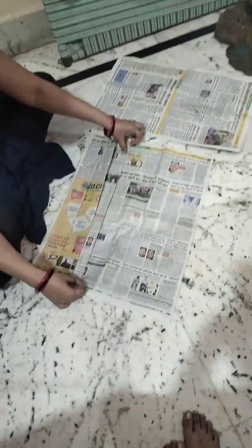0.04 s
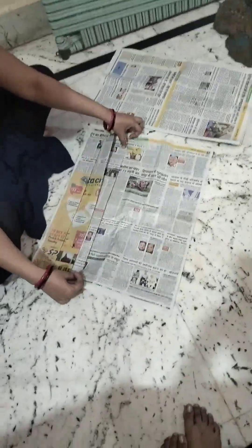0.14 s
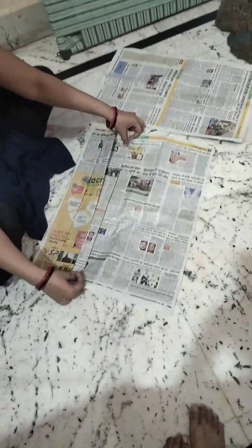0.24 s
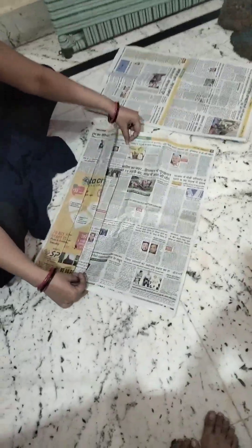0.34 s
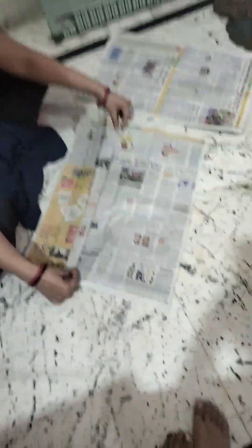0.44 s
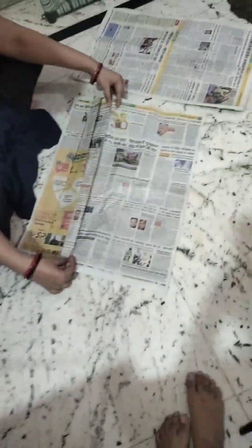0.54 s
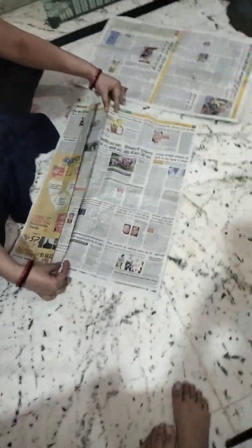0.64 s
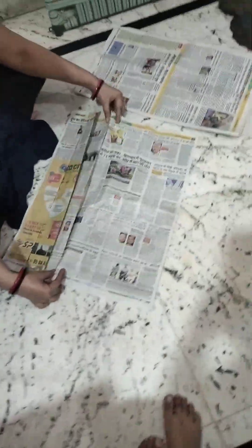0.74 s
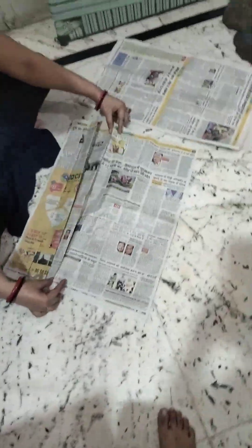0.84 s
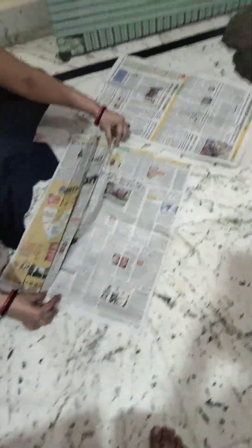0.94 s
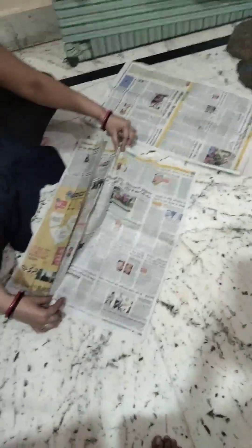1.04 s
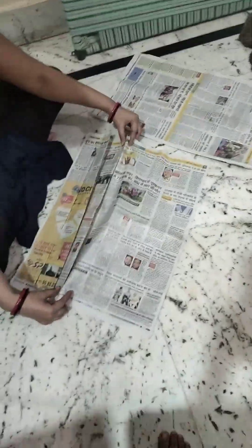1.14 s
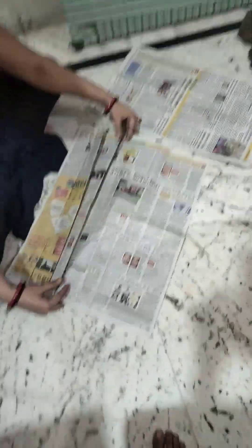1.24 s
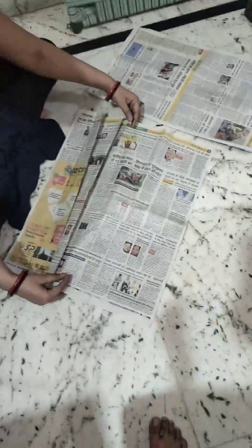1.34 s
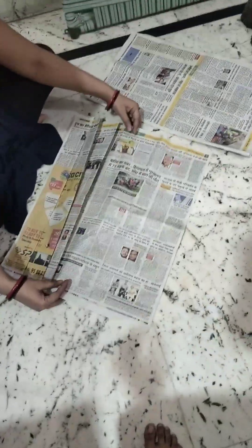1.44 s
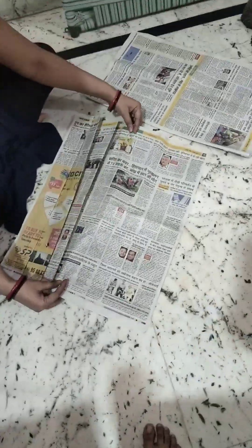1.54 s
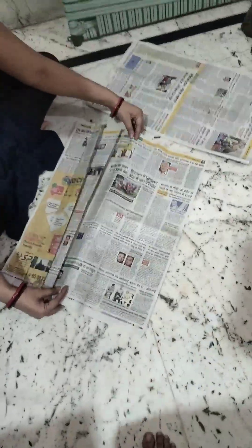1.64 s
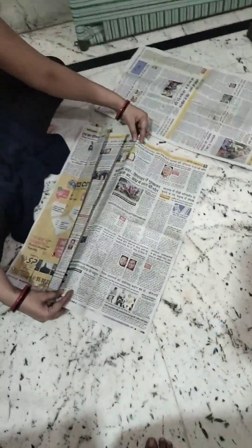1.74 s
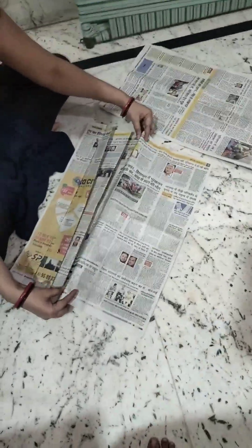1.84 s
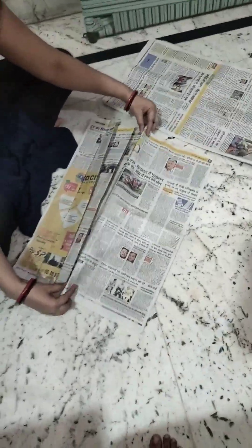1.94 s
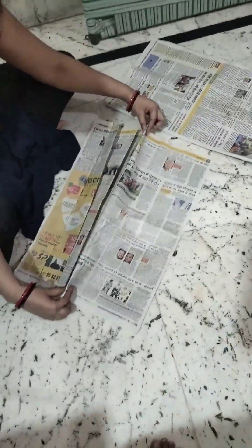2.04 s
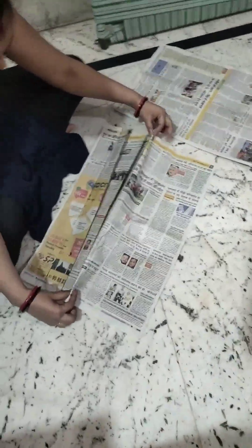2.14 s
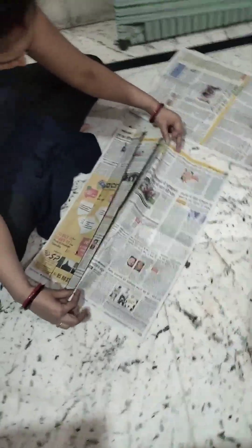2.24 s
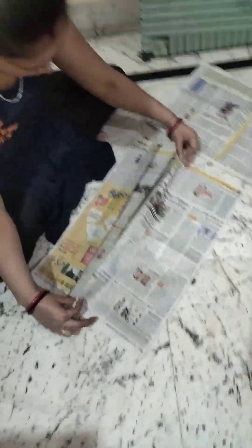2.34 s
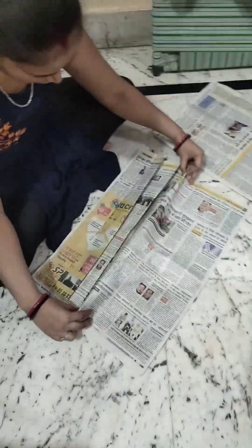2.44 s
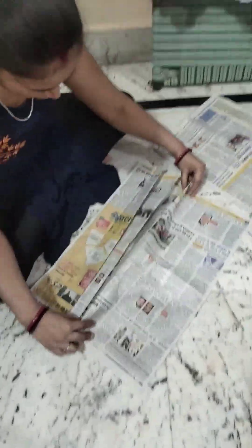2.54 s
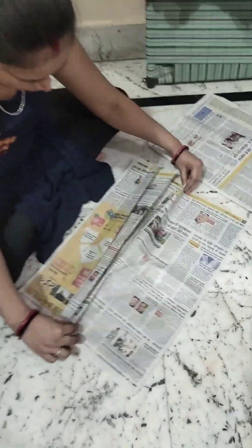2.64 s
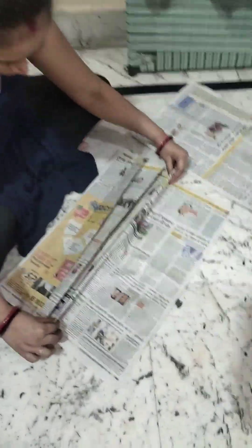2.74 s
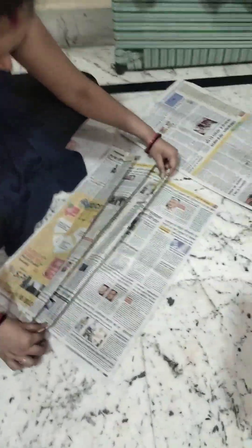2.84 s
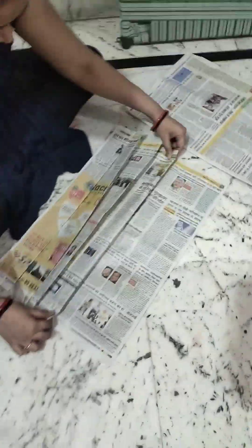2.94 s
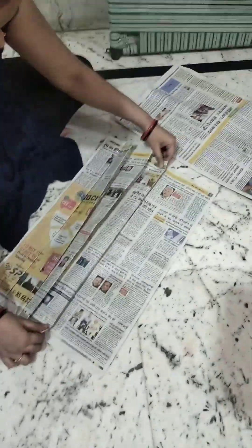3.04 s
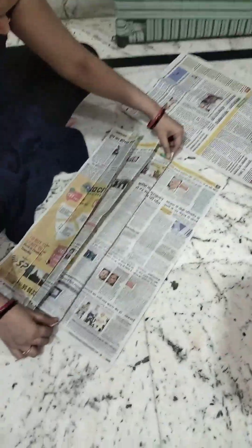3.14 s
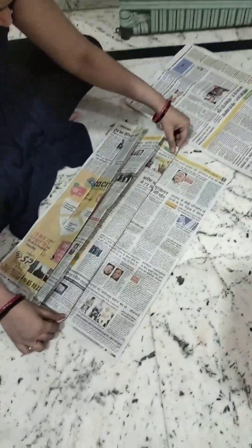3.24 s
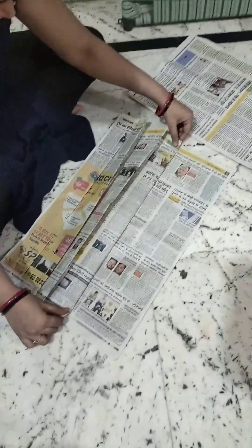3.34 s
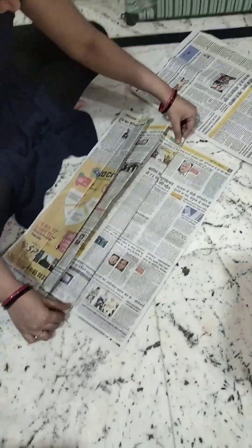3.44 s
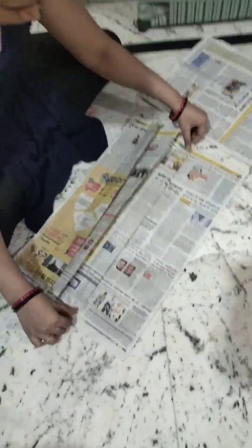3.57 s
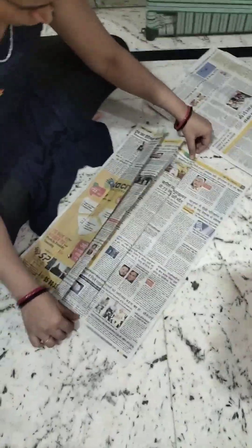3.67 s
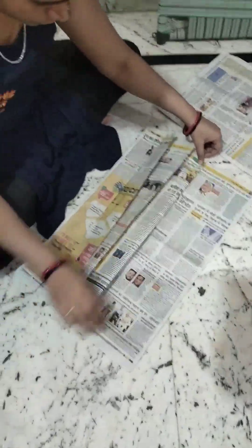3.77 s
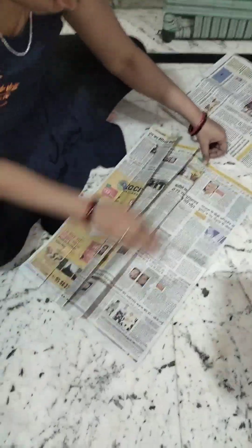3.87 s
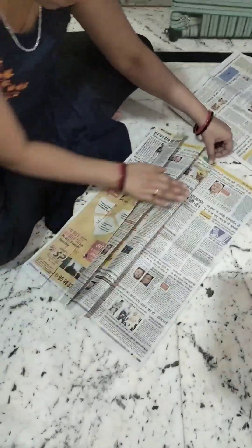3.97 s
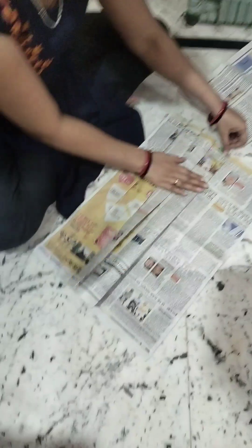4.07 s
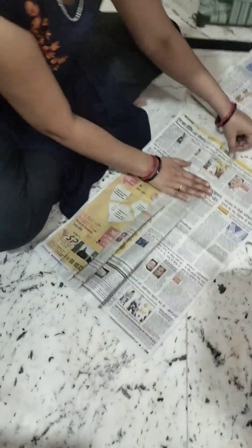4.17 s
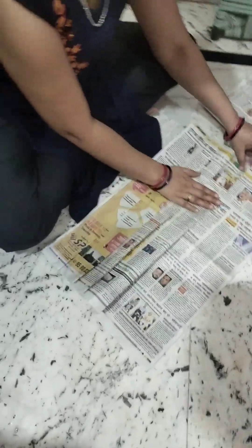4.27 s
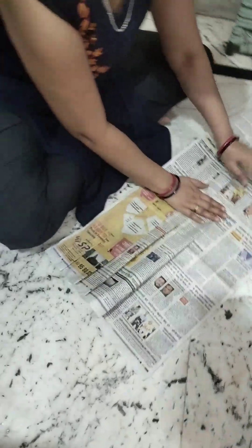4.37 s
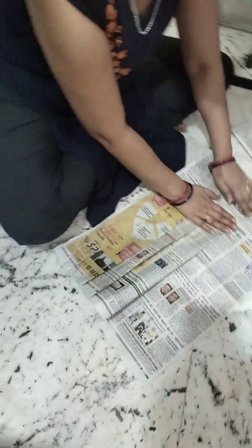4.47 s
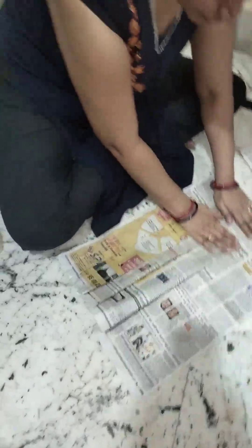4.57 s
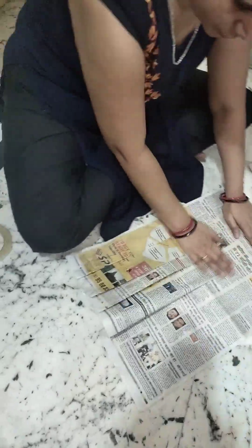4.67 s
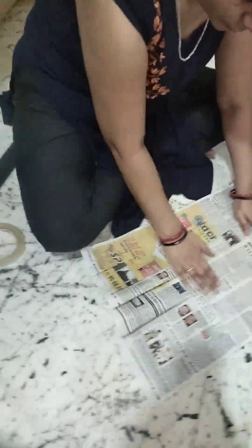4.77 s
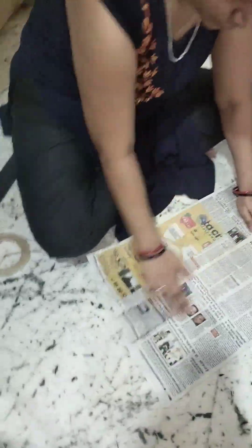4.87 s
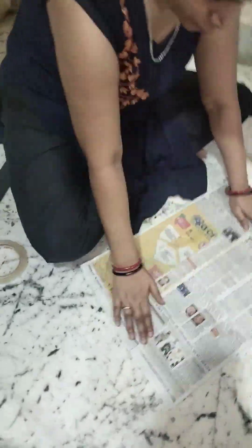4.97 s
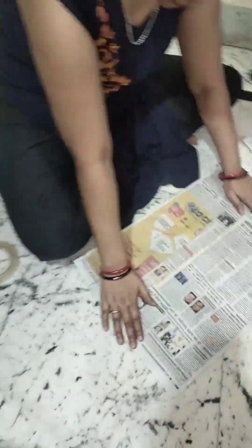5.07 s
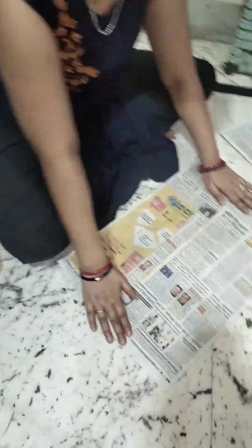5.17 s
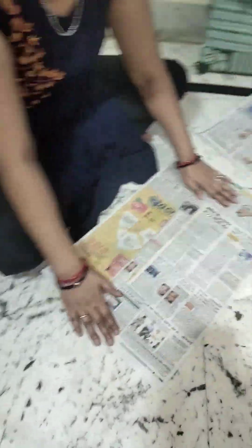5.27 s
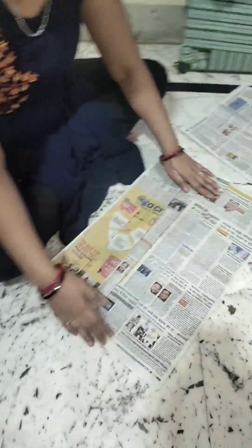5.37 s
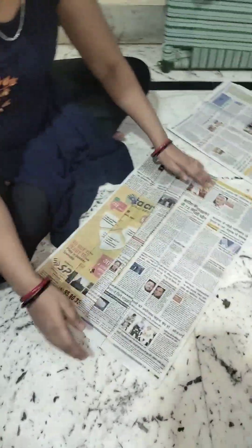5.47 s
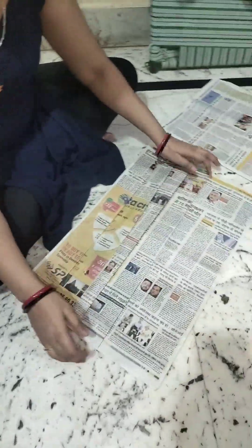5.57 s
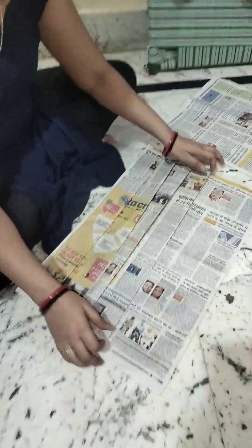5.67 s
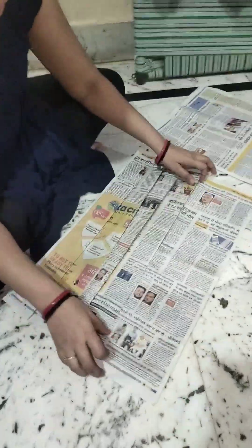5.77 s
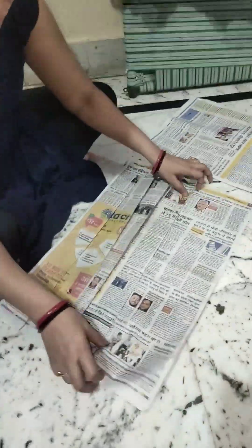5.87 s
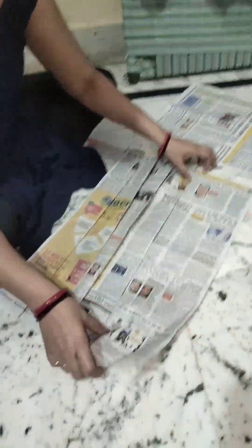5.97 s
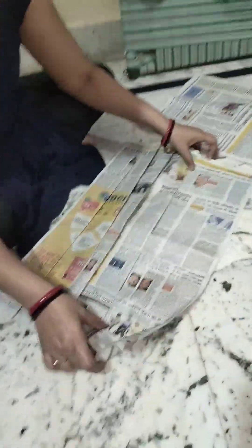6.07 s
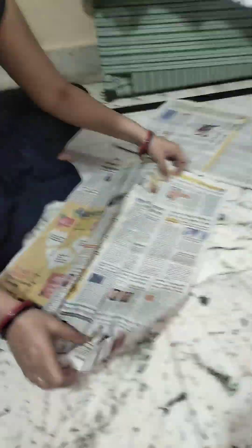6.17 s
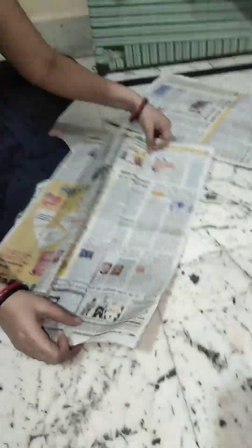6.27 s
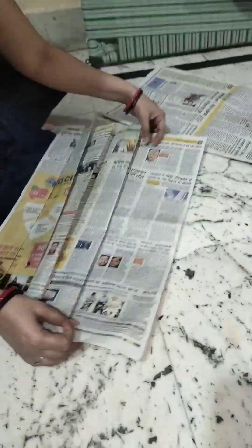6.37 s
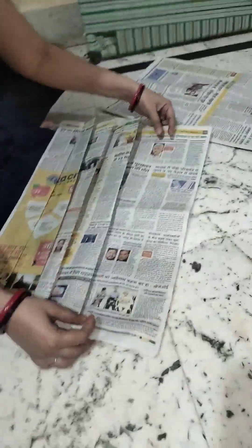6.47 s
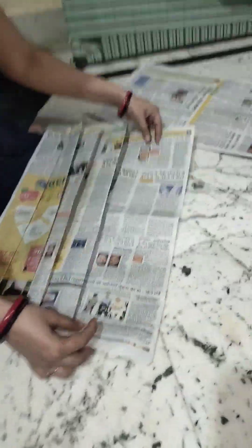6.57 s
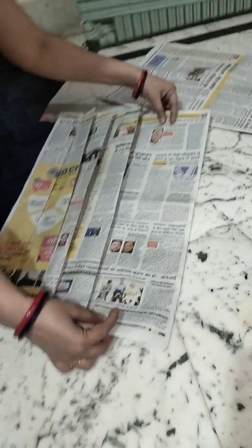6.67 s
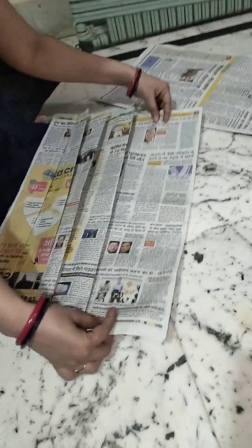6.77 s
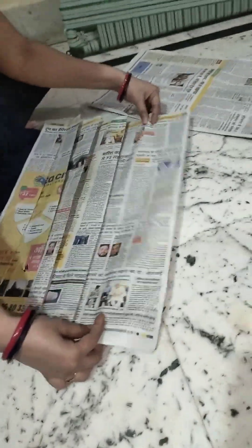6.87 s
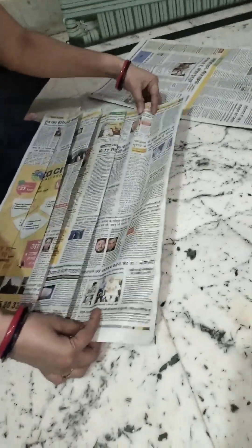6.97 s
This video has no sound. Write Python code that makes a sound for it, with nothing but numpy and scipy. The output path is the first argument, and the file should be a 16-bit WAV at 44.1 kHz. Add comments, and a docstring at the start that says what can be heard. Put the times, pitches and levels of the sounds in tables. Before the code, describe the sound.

Hands crease and press newspaper up close, with faint bangle clinks, a steady low hum and booming thuds of shifted wood.

```python
"""A bare room with a hard floor, filled by a fan-like hum.
Out of sight something heavy and wooden is dragged and bumped: jerks and blows make its body boom.
Up close, hands fold and press newspaper on the floor: creases snap over a rustle of tiny buckles,
and glass bangles clink on the wrist. A hand-held phone with two ports listens."""
import sys
import numpy as np
from scipy import signal
from scipy.fft import rfft, irfft, next_fast_len
from scipy.io import wavfile
from scipy.ndimage import uniform_filter1d, minimum_filter1d

SR = 44100
rng = np.random.default_rng(int(sys.argv[2]) if len(sys.argv) > 2 else 0)


def wrap_up_sound(samples):
    """Save the sound to the file named by the first command line argument, as 16-bit audio."""
    columns = np.atleast_2d(samples).T
    # keep every value between -1 and 1, then stretch to whole-number steps
    tamed = np.clip(columns, -1, 1)
    steps = np.round(tamed * 32767).astype(np.int16)
    wavfile.write(sys.argv[1], SR, steps)


N = 309141


def undb(db):
    return 10 ** (np.asarray(db) / 20)


def level(x, db):
    """Set the rms level."""
    return x * undb(db) / np.sqrt(np.mean(x ** 2))


def pan(x, db):
    """Place a sound with the left side db louder than the right."""
    return x * undb(np.array([db, -db]).reshape(2, -1) / 2)


def butter(x, order, hz, kind):
    return signal.sosfilt(signal.butter(order, hz, kind, fs=SR, output="sos"), x)


def band(x, lo_hz, hi_hz):
    return butter(x, 2, [lo_hz, hi_hz], "band")


def colour(x, table):
    """EQ through points of (frequency [Hz], level [dB])."""
    hz, db = np.transpose(table)
    size = next_fast_len(N)
    bins_hz = np.maximum(np.fft.rfftfreq(size, 1 / SR), 1)
    eq = undb(np.interp(np.log(bins_hz), np.log(hz), db))
    return irfft(rfft(x, size) * eq, size)[..., :N]


def ring(x, hz, t60):
    """One mode, deaf to steady pressure; a unit blow rings with amplitude near 1."""
    r, w = 1000 ** (-1 / (t60 * SR)), 2 * np.pi * hz / SR
    return signal.lfilter([1, -1], [1, -2 * r * np.cos(w), r * r], x)


def drift(rate_hz):
    """Smooth random modulation: held levels, slewed twice."""
    hold = int(SR / rate_hz)
    steps = np.repeat(rng.standard_normal(N // hold + 1), hold)
    return uniform_filter1d(uniform_filter1d(steps, hold), hold)[:N]


def grains(per_s, spread_db, length_s):
    """Noise let through by scattered short bursts of uneven size."""
    sizes = (rng.random(N) < per_s / SR) * undb(spread_db * rng.exponential(size=N))
    fall = np.exp(-1 / (length_s * SR))
    envelope = np.sqrt(signal.lfilter([1], [1, -fall], sizes ** 2))
    return level(rng.standard_normal(N) * envelope, 0)


def strokes(start_s, hold_s, db, rise_db_s, fall_db_s):
    """Power of each stroke, once a millisecond: it climbs until start_s, holds and fades."""
    t = np.arange(N * 1000 // SR + 1)[:, None] / 1000
    attack_db = rise_db_s * np.maximum(start_s - t, 0)
    release_db = fall_db_s * np.maximum(t - start_s - hold_s, 0)
    return undb(db - attack_db - release_db) ** 2


def fader(power):
    """Gain at every sample from powers a millisecond apart."""
    return np.interp(np.arange(N) / SR, np.arange(len(power)) / 1000, np.sqrt(power))


def diffuse(mid, side):
    """Sound from all around at two ports: the bass is shared, the treble unrelated."""
    side = butter(side, 1, 460, "high")
    return np.array([mid + side, mid - side]) / np.sqrt(2)


def room(send, low_t60=0.27, treble_t60=0.088):
    """Hard walls: a noise tail whose treble dies sooner."""
    t = np.arange(int(.7 * SR)) / SR
    wash = diffuse(*rng.standard_normal((2, len(t)))) * (1 - np.exp(-t / 0.005))
    low = butter(wash, 1, 2500, "low")
    tail = low * 1000 ** (-t / low_t60) + (wash - low) * 1000 ** (-t / treble_t60)
    tail /= np.sqrt(np.sum(tail ** 2) / 2)
    return signal.fftconvolve(send[None], tail, axes=1)[:, :N]


# Tone of the air bed: (frequency [Hz], relative level [dB])
AIR_EQ = [(12, -58), (20, 3.5), (79, 1.5), (145, -6), (191, 1.5), (296, -4), (460, -3), (542, -8),
          (714, -6), (1050, -12.5), (1670, -18.5), (6270, -40), (9470, -46.5), (12800, -40), (14300, -42)]
# Low humps in the hum: (centre [Hz], width [Hz], level [dB])
HUM_HUMPS = [(46.4, 18, -51), (98.3, 24, -46), (192.5, 20, -53.5)]


def hum(motor_hz=47.9):
    """The fan-like bed: steady air noise, a few low humps and a motor tone that wavers."""
    air = colour(diffuse(*rng.standard_normal((2, N))), AIR_EQ)
    air = level(air, -39.5) * undb(0.4 * drift(2.22))
    humps = sum(level(band(rng.standard_normal(N), hz - width / 2, hz + width / 2), db)
                for hz, width, db in HUM_HUMPS)
    pitch_hz = motor_hz * (1 + 0.059 * drift(6))
    motor = level(np.sin(2 * np.pi * np.cumsum(pitch_hz) / SR), -49.5)
    return pan(air, -1.0) + humps + motor


# Shoves of the heavy thing; where it bears on the floor picks the modes:
# (time [s], hold [s], level [dB], attack [dB/s], upper modes [dB], lowest modes [dB],
#  favoured middle pitch [Hz], middle focus [dB/octave^2], favoured lowest pitch [Hz])
SHOVES = [(3.46, 0.17, -41, 190, -6, -8, 338, 5, 92), (3.684, 0.0074, -27.5, 243, -13, -2, 196, 13, 100),
          (3.72, 0.14, -34, 243, -17, -1, 215, 9, 88.5), (3.833, 0.058, -23, 198, -6, -5.5, 262, -6, 84),
          (3.95, 0.086, -26, 200, -4, -9, 300, 3, 81.5), (4.14, .3, -45, 203, -5.5, -7, 308, 20, 92),
          (4.481, 0.038, -33.5, 2500, -5, -5, 250, 14, 97),
          (4.56, 0.16, -31.5, 124, -20, -1.5, 278, 19, 87),
          (4.87, 0.0045, -30.5, 350, -28, -5, 286, 9, 101),
          (4.961, 0.047, -9.5, 3000, -2, -17, 306, 22, 120),
          (5.042, 0.029, -13, 185, -6.5, -13.5, 322, 20.5, 122),
          (6.34, 0.021, -38.5, 130, -12, -1, 238, 12, 96), (6.385, .015, -23, 1500, -8.5, -25, 232, 39, 97),
          (6.762, 0.0089, -18, 1300, -4, -18, 228, 14.5, 112),
          (6.972, .002, -44.5, 902, 9, -10, 250, -3, 110)]
# Single blows to it: (time [s], drive level [dB])
BUMPS = [(3.688, -22), (3.701, -26), (3.838, -16), (3.941, -18.5), (3.974, -13.5), (4.022, -17),
         (4.481, -19), (4.958, -11.5), (5.005, -9.5), (5.054, -28), (6.387, -11.5), (6.751, -13.5),
         (6.763, -11.5), (6.777, -9), (6.972, -33)]
# Modes of its wooden body: (frequency [Hz], level [dB], decay t60 [s])
WOOD_MODES = [(86, 0, 0.37), (123.3, 7, 0.34), (164.1, 1.5, 0.095), (207, 0.5, 0.14), (238, 1, 0.086),
              (289.3, 0.5, 0.064), (314, 0, 0.32), (360.8, 2, 0.19), (429, -6, 0.28), (480, 3, 0.019),
              (536.3, 0, 0.076), (614, 2, 0.048), (723, -5, 0.078), (801, -7, 0.028), (914, -10, 0.1),
              (1280, -23, 0.055), (1730, -7, 0.02)]


def dragged_wood():
    """Stick-slip jerks and single blows drive the body's modes; the boom arrives from all sides."""
    jerks = np.array([grains(per_s=400, spread_db=0.5, length_s=0.0027) for _ in range(2)])
    jerks = butter(jerks, 4, 1200, "low")  # wood grips softly: no treble
    s, hold, db, rise_db_s, upper_db, lowest_db, middle_hz, focus_db, lowest_hz = np.transpose(SHOVES)
    power = strokes(s, hold, db, rise_db_s, fall_db_s=178) + 1e-30
    upper_power = strokes(s, hold, db, rise_db_s, fall_db_s=263) + 1e-30  # upper modes fade first
    force = fader(power.sum(axis=1))
    bump_s, bump_db = np.transpose(BUMPS)
    blows = np.zeros(N)
    blows[(bump_s * SR).astype(int)] = undb(bump_db)
    contact = np.hanning(int(0.00074 * SR))  # wood on stone: short and rounded
    blows = np.convolve(blows, contact / contact.sum())[:N]
    boom = np.zeros((2, N))  # mid and side
    for hz, mode_db, t60 in WOOD_MODES:
        if hz < 150:
            mode_power = power @ undb(lowest_db - 60 * np.log2(hz / lowest_hz) ** 2) ** 2
        elif hz < 450:
            mode_power = power @ undb(-focus_db * np.log2(hz / middle_hz) ** 2) ** 2
        else:
            mode_power = upper_power @ undb(upper_db) ** 2
        share = fader(mode_power) / force
        polarity = rng.choice([-1., 1.], (2, 1))
        build_up = np.sqrt(t60 * SR / (4 * np.log(1000)))  # a longer ring stores more of the jerks
        drive = polarity * (jerks * force / build_up + blows)
        boom += ring(drive * share * undb(mode_db), hz, t60)
    return diffuse(boom[0], undb(-3.1) * boom[1])


# Glass bangles touching: (time [s], level [dB], pitch [ratio])
CLINKS = [(4.276, -62, 1), (4.287, -52, 1), (4.305, -59, 0.88), (4.741, -53, 0.96), (5.7295, -50, 1),
          (5.752, -61, 1)]
# Their modes, mostly in close pairs: (frequency [Hz], level [dB], decay t60 [s])
GLASS_MODES = [(6550, -10, 0.18), (8720, -6, 0.18), (8750, -6, 0.16), (10400, -4, 0.13), (10330, -8, 0.17),
               (11100, -11, .2), (12360, -4, 0.2), (12255, -5, 0.073), (12200, -17, 0.14)]


def bangles(flutter_db=5):
    """Each touch rings the modes in a new balance; they flutter as the bangles roll on the wrist."""
    shares = undb(1.5 * rng.standard_normal((len(CLINKS), len(GLASS_MODES))))
    out, tap = np.zeros(N + SR), signal.unit_impulse(SR // 2)
    for (s, db, ratio), balance in zip(CLINKS, shares):
        start = int(s * SR)
        for (hz, mode_db, t60), share in zip(GLASS_MODES, balance):
            note = ring(tap, hz * ratio, t60)
            strike = ring(tap, hz * ratio, t60=0.017)
            out[start:start + len(tap)] += undb(db + mode_db) * share * (note + strike)
    return out[:N] * undb(flutter_db * drift(150))


# Tone of the newspaper: (frequency [Hz], relative level [dB])
PAPER_EQ = [(180, 0), (300, 0.5), (376, -6.5), (730, 0), (1130, -4), (2230, -2), (2980, -8), (6070, -21),
            (8120, -33), (12600, -36.5), (14300, -40.5)]
# Faint stirring of the sheet between crumples: (time [s], level [dB], treble offset [dB])
STIR = [(0, -45.5, -7), (.6, -50, -5), (1.0, -49.5, -8), (1.4, -45, -9.5), (1.6, -48.5, -26),
        (1.9, -46.5, -8.5), (2.3, -46.5, -11.5), (2.5, -42.5, -12.5), (2.75, -45.5, -10.5), (3.3, -48, -7),
        (3.8, -47, -11), (4.18, -51.5, -17), (4.4, -40.5, -6), (4.63, -47.5, -5.5), (5.1, -38, 0.5),
        (5.3, -64, 4.5), (5.7, -52, -1.5), (5.9, -60.5, -5), (6.2, -44, -1.5), (6.7, -55.5, -7.5),
        (7.01, -42.5, -13.5)]
# Hands crumple or sweep the sheet: (time [s], hold [s], level [dB], treble offset [dB])
CRUMPLES = [(.01, 0.034, -44.5, -4.5), (.3, 0.094, -39.5, -7), (.46, 0.03, -44, -1), (.58, 0.13, -43, -23),
            (.757, 0.0089, -36.5, -8.5), (.84, .03, -42, -11), (1.072, 0.015, -33.5, -6),
            (1.12, 0.049, -41, 2), (1.35, 0.027, -45, -5), (1.46, 0.033, -45, -7.5), (1.695, .01, -38, -9),
            (1.76, .02, -35.5, -2.5), (2.145, 0.03, -43.5, -3), (2.22, 0.011, -40, -5),
            (2.78, 0.019, -31.5, -5.5), (2.85, 0.08, -30.5, -3.5), (2.99, 0.031, -35, -0.5),
            (3.07, 0.13, -45.5, 2.5), (3.49, 0.0081, -43.5, -12), (3.62, 0.14, -46, -14),
            (3.88, 0.087, -42, -10), (4.237, 0.04, -32, -9), (4.28, 0.043, -36, -8),
            (4.7, 0.044, -45.5, -11), (4.819, 0.022, -34.5, -4), (4.86, .09, -32, -2),
            (4.96, 0.026, -23, -22), (5.0, 0.036, -23.5, -7.5), (6.03, 0.036, -45, 1.5),
            (6.185, 0.0085, -48, -10), (6.3, .07, -44.5, -5), (6.38, .005, -33.5, -7.5),
            (6.761, 0.022, -37, -14), (6.97, 0.015, -38, -27)]
SHEET_PAN_DB = -.5


def paper_rustle():
    """Many tiny buckles all over the sheet; the treble share follows how crisply it bends."""
    t = np.arange(N) / SR
    stir_s, *stir_curves = np.transpose(STIR)
    stir_db, stir_treble_db = (np.interp(t, stir_s, curve) for curve in stir_curves)
    stir_db += 2 * drift(12)  # it comes and goes
    s, hold, db, treble_db = np.transpose(CRUMPLES)
    power = strokes(s, hold, db, rise_db_s=509, fall_db_s=235)
    buckles = diffuse(*[grains(per_s=2500, spread_db=2.4, length_s=.002) for _ in range(2)])
    sheet = level(colour(buckles, PAPER_EQ), 0)
    treble = signal.sosfiltfilt(signal.butter(2, 6000, "high", fs=SR, output="sos"), sheet)
    body_gain = np.hypot(fader(power.sum(axis=1)), undb(stir_db))
    treble_gain = np.hypot(fader(power @ undb(treble_db) ** 2), undb(stir_db + stir_treble_db))
    return pan(body_gain * (sheet - treble) + treble_gain * level(treble, 0), SHEET_PAN_DB)


# Creases giving way, plus one crack at 4.9556 s that sharpens the onset of the heavy shove: (time [s], pop
# level [dB], pop pitch [Hz], tick offset [dB])
SNAPS = [(0.189, -34, 2520, -10), (0.283, -28.5, 1250, 1), (0.329, -24, 2900, -17), (0.4589, -35, 1190, 0),
         (0.5035, -23, 3600, -15), (0.5893, -35, 2570, -24), (0.657, -24.5, 2380, -24),
         (0.7543, -20, 1710, -35), (0.823, -29, 1800, -20), (0.843, -26, 1970, -22),
         (1.022, -28, 1560, -15), (1.069, -26, 1640, -15), (1.0794, -12.5, 1730, -16),
         (1.1252, -16, 2040, -10), (1.1593, -16.5, 2020, -11), (1.3587, -23, 2300, -12),
         (1.447, -27, 1860, -24), (1.4802, -25, 2120, -20), (1.695, -21.5, 2220, -19),
         (1.7522, -15, 2260, -20), (1.7621, -12.5, 2070, -25), (2.134, -28, 2070, -22),
         (2.1467, -35, 1760, 2), (2.22, -22, 2130, -8), (2.376, -33, 1270, -23), (2.779, -14, 1960, -18),
         (2.8627, -12.5, 1760, -4.5), (2.891, -10.5, 2410, -20), (2.953, -17, 1940, -22),
         (2.9932, -17.5, 2340, -17), (3.008, -13, 3060, -10), (3.07, -24, 2520, -17),
         (3.094, -25, 2510, -13), (3.1253, -15.5, 2300, -11), (3.184, -23.5, 2090, -21),
         (3.217, -27, 2260, 0), (3.406, -28, 2130, -13), (3.491, -23, 1800, -11.5),
         (3.8803, -28, 1760, -5.5), (3.944, -27, 1190, -28), (4.2288, -14, 2320, -21),
         (4.784, -24, 1960, -10), (4.8504, -16, 2320, -18), (4.914, -16, 2310, -8),
         (4.9325, -12.5, 2260, -8), (4.9556, -19, 1900, -12), (5.199, -34, 3000, 1),
         (5.464, -34, 5100, -21), (5.7294, -38, 4000, 10), (5.9572, -32.5, 2120, -13),
         (6.0008, -30.5, 2140, -8), (6.029, -29, 2220, -13), (6.2054, -19, 2850, -17),
         (6.355, -28, 1240, -9), (6.3809, -16, 1930, -20), (6.7502, -25, 1410, -14),
         (6.765, -29, 1310, -25), (6.9735, -37, 2120, -11), (6.988, -17.5, 2150, -44)]


def crease_snaps(attack_s=0.00058, crack_t60=0.021, tick_t60=0.01):
    """Each crease gives a hollow pop at its own pitch inside a wider crack, and a briefer tick on top."""
    out, t = np.zeros((2, N + SR)), np.arange(SR // 8) / SR
    for s, db, hz, tick_db in SNAPS:
        puff = diffuse(*rng.standard_normal((2, len(t)))) * (1 - np.exp(-t / attack_s)) ** 2
        crack = puff * 1000 ** (-t / crack_t60)
        pop = band(crack, hz / 1.285, hz * 1.157) + undb(-6.5) * band(crack, hz / 1.56, hz * 2.36)
        tick = band(puff * 1000 ** (-t / tick_t60), 8900, 13700)
        snap = pop / np.abs(pop).max() + undb(tick_db) * tick / np.abs(tick).max()
        pan_db = SHEET_PAN_DB + 4 * rng.standard_normal()  # anywhere on the sheet
        start = int(s * SR)
        out[:, start:start + len(t)] += pan(undb(db) * snap, pan_db)
    return out[:, :N]


def scene():
    """Paper, wood and glass share one room reverb, over the hum."""
    paper = paper_rustle() + crease_snaps()
    wood, glass = dragged_wood(), bangles()
    direct = paper + pan(wood, -0.2) + pan(glass, 1.5)
    send = undb(-9) * paper[0] + undb(-13.0) * wood[0] + undb(7.5) * glass
    return direct + room(send) + hum()


def record(dry):
    """The phone drops the deepest bass, a limiter holds the loudest peaks, and the top is cut."""
    ceiling, look_ahead, top_hz = .97, int(.006 * SR), 14250
    dry = butter(dry, 4, 33, "high")
    safe_gain = np.minimum(1, ceiling / (np.abs(dry).max(axis=0) + 1e-9))
    held_gain = minimum_filter1d(safe_gain, 2 * look_ahead)
    limited = dry * uniform_filter1d(held_gain, look_ahead)
    return signal.sosfilt(signal.ellip(12, .2, 90, top_hz, fs=SR, output="sos"), limited)


dry = scene()
out = record(dry)
wrap_up_sound(out)
```